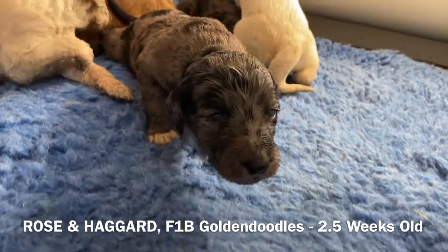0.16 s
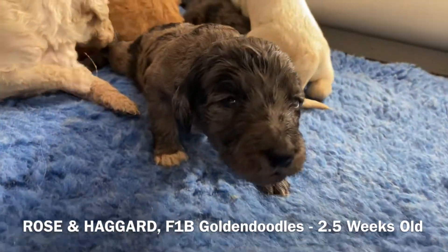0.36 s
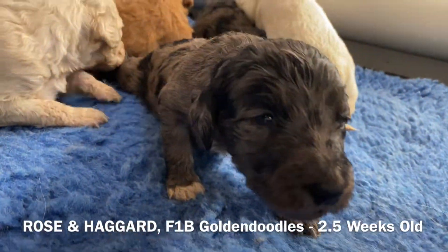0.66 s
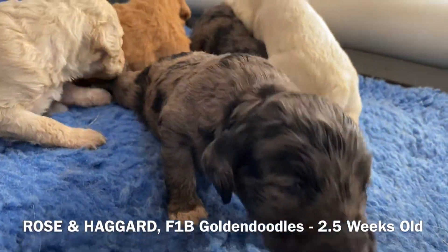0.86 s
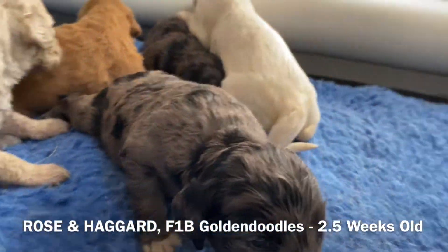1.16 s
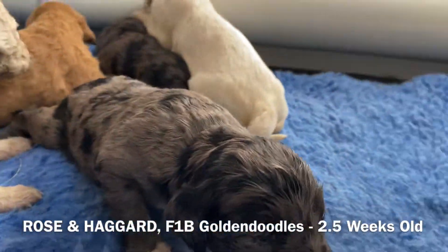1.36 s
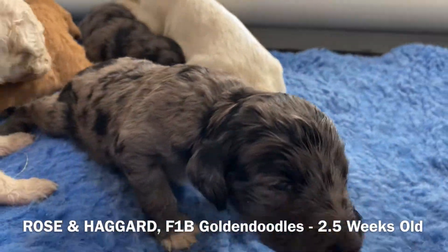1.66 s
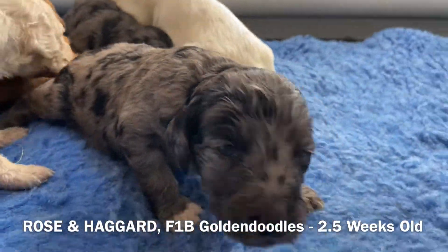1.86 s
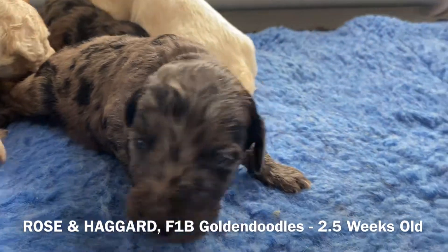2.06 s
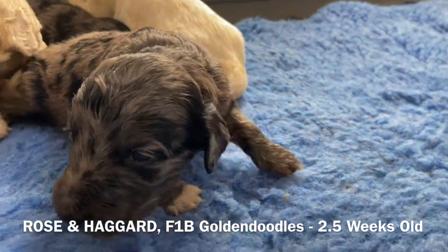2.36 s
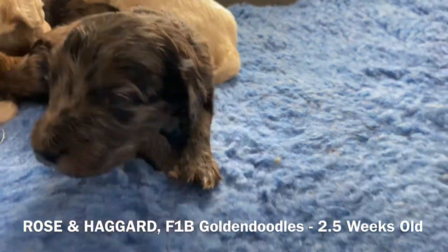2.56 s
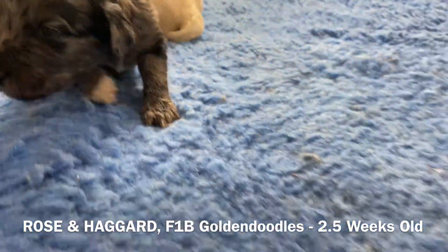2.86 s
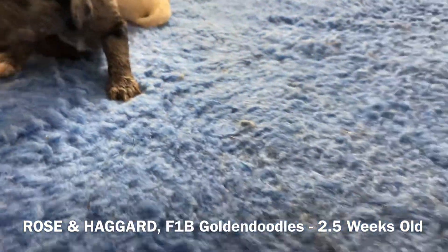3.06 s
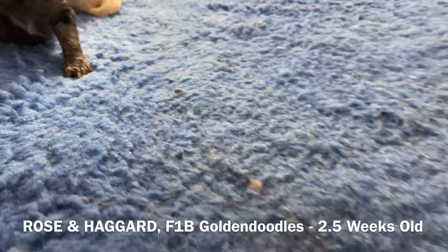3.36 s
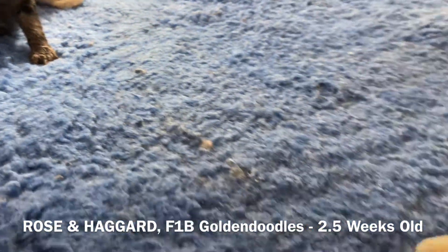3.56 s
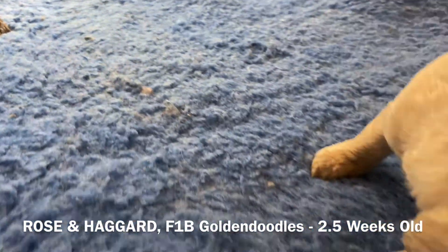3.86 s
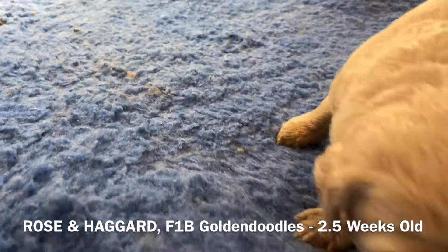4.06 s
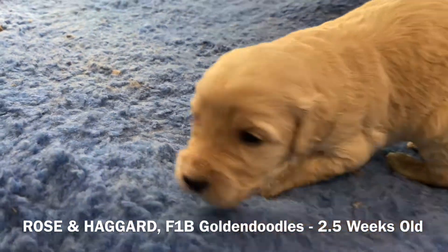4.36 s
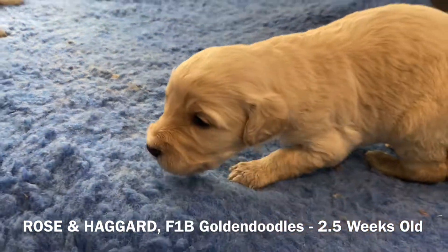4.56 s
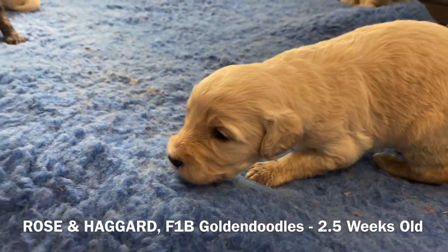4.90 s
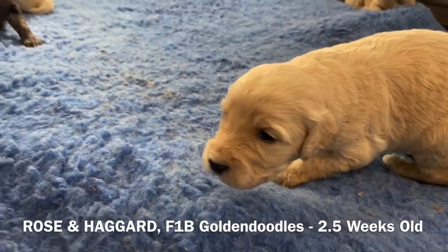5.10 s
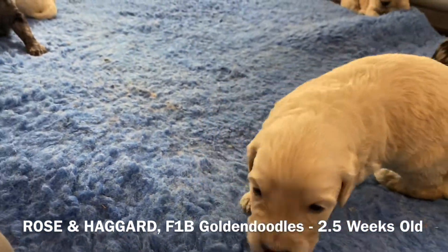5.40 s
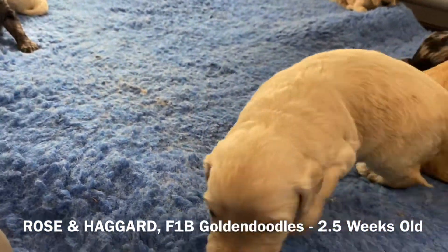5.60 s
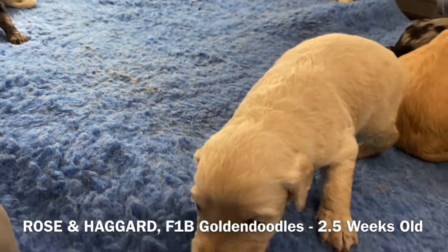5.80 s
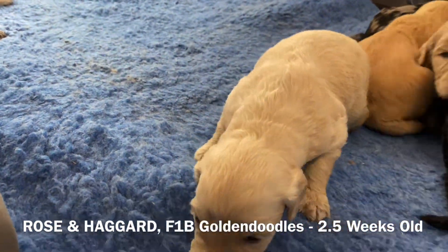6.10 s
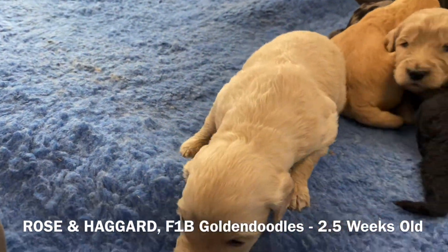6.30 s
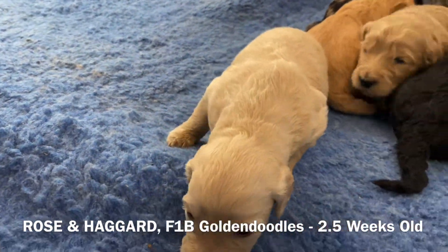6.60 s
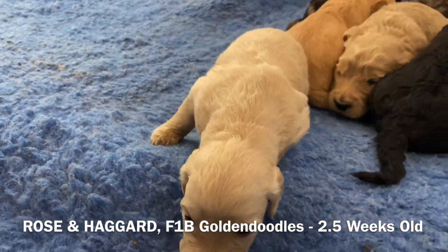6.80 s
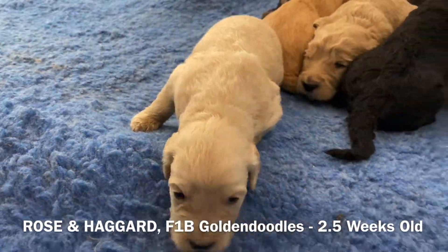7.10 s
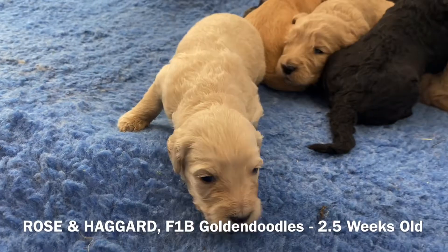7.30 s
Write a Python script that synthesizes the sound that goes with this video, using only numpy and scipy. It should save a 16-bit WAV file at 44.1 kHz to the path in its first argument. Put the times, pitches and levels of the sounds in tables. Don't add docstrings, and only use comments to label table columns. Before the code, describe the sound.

A hand-held microphone close to puppies on fleece in a lightly echoing room. Brief whimpers rise into brighter cries, with thin nose whistles, low grunts and small knocks. A sharp, deep thump interrupts, rattling briefly. After a quieter gap, a near puppy groans from a clear voice into a rasp, with a knock alongside, followed by another grunt and overlapping faint whines.

```python
import sys
import numpy as np
from scipy import signal
from scipy.fft import rfft, irfft
from scipy.io import wavfile
from scipy.ndimage import uniform_filter1d

SR = 44100
rng = np.random.default_rng(int(sys.argv[2]) if len(sys.argv) > 2 else 0)


def gain_from_db(level_db):
    decades = np.asarray(level_db, float) / 20
    return 10 ** decades


def log_audio(samples):
    frames = np.atleast_2d(samples).T
    limited = np.clip(frames, -1, 1)
    pcm = np.round(limited * 32767).astype(np.int16)
    wavfile.write(sys.argv[1], SR, pcm)


N = 328545

# (frequency [Hz], level [dB])
FLEECE = [(300, 2.5), (480, -16.5), (800, -13.5), (1500, 8.5), (2500, -5), (4500, -8), (6500, -11),
          (9000, -45.5)]


def evened(x):
    return x / np.sqrt(np.mean(x ** 2) + 1e-20)


def read(points, hz):
    f, value = np.transpose(points)
    return np.interp(np.log(hz + 1), np.log(f + 1), value)


def add(mix, s, sound):
    part = mix[round(s * SR):][:len(sound)]
    part += sound[:len(part)]


def coloured(x, points):
    hz = np.fft.rfftfreq(x.shape[-1], 1 / SR)
    return irfft(rfft(x) * gain_from_db(read(points, hz)), x.shape[-1])


def resonate(x, hz, width):
    turn = np.exp(2j * np.pi * hz * np.arange(x.shape[-1]) / SR)
    r = np.exp(-np.pi * width / SR)
    return 2 * (turn * signal.lfilter([1 - r], [1, -r], x / turn)).real


def wander(length, smooth):
    once = uniform_filter1d(rng.standard_normal(length), int(smooth))
    return evened(uniform_filter1d(once, int(smooth)))


def air(same):
    a, b = rng.standard_normal((2, N))
    return np.array([a, same * a + np.sqrt(1 - min(same, 1) ** 2) * b])


def swells(rows, rest_db):
    climb_db = -20
    t = np.arange(0, N + 64, 64)[:, None] / SR
    s, db, rise, fade = np.transpose(rows)
    before = climb_db * (s - t) / np.maximum(rise, 1e-3)
    after = -abs(fade) * (t - s)
    levels = db + np.where(t < s, before, after)
    gain = np.sqrt(gain_from_db(rest_db) ** 2 + (gain_from_db(levels) ** 2).sum(1))
    return np.interp(np.arange(N) / SR, t[:, 0], gain)


def handling():
    # (peak time [s], level [dB], rise [s], fade [dB/s])
    jolts = [(.13, -28.5, 0.2, 102), (.33, -40, 0.28, 198), (.52, -42.5, 0.35, 18.5), (.97, -33, 0.029, 56),
             (1.15, -46, 0.15, 4.5), (1.89, -25, .08, 206.5), (1.95, -36.5, 0.042, 20),
             (2.27, -32.5, 0.16, 95), (2.43, -39.5, 0.092, 145), (2.53, -38.5, .1, 151),
             (2.7, -52.5, 0.43, 13), (3.44, -46, 0.24, 392), (3.65, -34, 0.1, 192),
             (3.73, -32.5, 0.053, 109.5), (3.86, -37, 0.019, 42), (3.98, -21.5, 0.22, 91),
             (4.1, -43, 0.32, 359), (4.32, -39.5, 0.21, 54), (4.52, -37, 0.14, 37), (5.37, -50.5, .8, 23),
             (6.1, -44, 0.84, 286), (6.68, -48, 0.051, 181), (7.03, -39, 0.73, 164), (7.41, -44, 0.2, 306)]
    # (frequency [Hz], width [Hz], level [dB])
    body_modes = [(43.7, 33, -18), (56, 28, 5.5), (77.8, 22.4, 0.5), (104.2, 19, -16)]
    shake = air(.97)
    modes = 0
    for hz, width, db in body_modes:
        ringing = resonate(resonate(shake, hz, width), hz, 0.59 * width)
        modes = modes + gain_from_db(db) / np.sqrt(width) * ringing
    return evened(modes) * gain_from_db(-2.5) * swells(jolts, rest_db=-51.5)


def room_floor():
    # (frequency [Hz], level [dB])
    hum = [(100, -2.5), (165, -1.5), (200, -9), (350, -18.5), (500, -38), (700, -12.5), (900, -9),
           (1200, -21), (1600, -24), (2200, -31.5), (3200, -50), (6000, -40.5), (10000, -59.5),
           (14000, -85)]
    return gain_from_db(-52.5 + 2.5 * wander(N, 3000)) * evened(coloured(air(0.91), hum))


def rustle():
    # (peak time [s], level [dB], rise [s], fade [dB/s], airy top above it [dB])
    rubs = [(0, -61.5, .01, 61, 5.5), (.62, -70, 0.086, 86, 13.5), (.79, -75, .03, 60, -5),
            (.97, -70.5, 0.11, 99, -10), (1.196, -58.5, 0.066, 133, 16.5), (1.6, -70, 0.054, 90, 3),
            (2.18, -57, 0.087, 52, 2), (2.311, -51.5, 0.033, 143.5, 3), (2.45, -69.5, 0.14, 68.5, 12.5),
            (2.8, -60.5, 0.23, 44.5, -2), (3.09, -54.5, 0.11, 58.5, 5), (3.24, -56.5, 0.35, 53, -3.5),
            (3.6, -65, 0.19, 20.5, 3), (3.69, -55.5, 0.016, 66, -1), (3.856, -34, 0.018, 497, -17.5),
            (3.881, -44.5, 0.018, 100, -3), (4.19, -62.5, 0.1, 74.5, 9), (4.47, -53.5, 0.026, 78, -5),
            (5.214, -66, 0.015, 44, 27.5), (5.277, -51.5, 0.032, 58.5, 20.5), (5.38, -67, 0.068, 123, 22),
            (5.56, -59, 0.11, 31, 13), (5.73, -66.5, .15, 200, 19), (5.87, -67, .08, 53, -7),
            (6.06, -67.5, 0.11, 40, 10), (6.36, -66.5, 0.15, 50, 5), (6.64, -68, 0.037, 20, 5),
            (7.04, -69.5, 0.12, 34, 12), (7.3, -71, 0.2, 25, 17), (7.45, -55, 0.053, 50, -10)]
    # (frequency [Hz], level [dB])
    airy_colour = [(5000, -8), (7500, -3.5), (10000, -2.5), (12200, -9.5), (13200, -10.5), (15300, -13),
                   (15900, -67)]
    rest_db = -80.5
    moves, top_db = np.array(rubs)[:, :4], np.array(rubs)[:, 4:]
    airy_moves = moves + top_db * [0, 1, 0, 0]
    body = evened(coloured(air(0.54), FLEECE)) * gain_from_db(6.5) * swells(moves, rest_db)
    top = evened(coloured(air(0.96), airy_colour)) * gain_from_db(-17.0) * swells(airy_moves, rest_db + 9.5)
    return (body + top) * gain_from_db(1.34 * wander(N, 170))


def shuffle():
    # (peak time [s], level [dB], rise [s], fade [dB/s])
    shifts = [
        (0, -49.5, .01, 90),
        (2.14, -45, 0.29, 54),
        (3.7, -54.5, 3.2, 15),
        (5.28, -48, 0.2, 29),
        (5.7, -46, 0.18, 48),
    ]
    colour = [(120, -22.5), (200, 5), (330, -1.5), (520, -37.5), (1500, -33.5), (2500, -59.5)]  # (Hz, dB)
    dull = evened(coloured(air(0.91), colour))
    return dull * swells(shifts, rest_db=-66.5) * gain_from_db(5.1 * wander(N, 1100))


def whimpers(calls, bright_db, start_db, top_db):
    # (harmonic frequency [Hz], level [dB])
    shut_mouth = [(300, 18), (680, 6.5), (800, 8), (950, 8), (1400, 4.5), (1700, -5), (2100, -14.5),
                  (3000, -64), (12000, -76.5)]
    # (harmonic frequency [Hz], level [dB])
    open_mouth = [(3900, -16), (4400, 13), (4800, 17.5), (5700, 8), (6400, 6.5), (8500, -0.5), (11000, -11),
                  (13000, -59)]
    climb_share = .6
    out, k = np.zeros(N), np.arange(1, 12)[:, None]
    for s, length, first_hz, top_hz, db in calls:
        u = np.linspace(0, 1, round(length * SR))
        climb = np.sin(np.pi / 2 * np.minimum(u / climb_share, 1)) ** 1.4
        sag = 0.408 * np.maximum(u - climb_share, 0)
        hz = first_hz + (top_hz - first_hz) * (climb - sag)
        hz = hz * (1 + .016 * wander(len(u), 140))
        overtone_db = (start_db + (top_db - start_db) * climb) * (k > 1)
        heights = gain_from_db(read(shut_mouth, k * hz) + overtone_db)
        heights = heights + climb * gain_from_db(bright_db + read(open_mouth, k * hz))
        voice = (heights * np.cos(2 * np.pi * k * np.cumsum(hz) / SR)).sum(0)
        throb = gain_from_db(3.5 * wander(len(u), 300)) * (1 + .15 * wander(len(u), 70))
        swell = np.sin(np.pi * u ** 0.59) ** 1.28
        add(out, s, gain_from_db(db) * throb * voice * swell)
    return out


def whines():
    # (start [s], length [s], first pitch [Hz], top
    # pitch [Hz], level [dB])
    calls = [(0, 0.033, 920, 720, -56), (0.02, 0.11, 1105, 991, -65.5), (.135, 0.055, 794, 787, -57),
             (.543, 0.035, 710, 780, -53.5), (.775, 0.05, 843, 995, -63), (3.535, 0.096, 694, 617.4, -51),
             (4.975, 0.11, 741, 717, -60.5), (4.674, 0.048, 900, 966, -65), (5.986, 0.08, 867, 999, -58.5),
             (6.265, 0.13, 790, 1327, -52.5), (6.595, 0.084, 663, 724, -52), (6.69, 0.072, 877, 966, -53.5),
             (7.055, 0.0786, 837, 965, -54.5), (6.62, 0.11, 756, 1100, -53), (6.958, 0.15, 740, 1077, -53),
             (7.271, 0.11, 674, 681, -65), (7.326, 0.15, 820, 1037, -63.5), (7.405, 0.17, 678, 677, -57.5)]
    return whimpers(calls, bright_db=-37.5, start_db=-0.82, top_db=-9)


def fingers():
    # (time [s], peak level [dB])
    ticks = [(.096, -37), (.983, -38), (1.067, -35), (1.118, -35), (1.194, -38), (1.783, -39), (2.223, -32),
             (4.16, -38), (4.188, -38), (4.488, -35), (4.537, -35), (4.574, -37)]
    out, u = np.zeros(N), np.arange(220) / 220
    for s, db in ticks:
        add(out, s, gain_from_db(db + 1.5) * np.sin(2 * np.pi * 2.4 * u) * np.exp(-5 * u))
    rub = evened(resonate(rng.standard_normal(N), 450, 350))
    out += gain_from_db(-69.5 + 5.5 * wander(N, 400)) * rub
    return out * np.array([[1], [-1]])


def coos():
    # (start [s], length [s], first pitch [Hz], top pitch [Hz], level [dB])
    calls = [
        (.112, 0.1, 441, 373, -54.5),
        (.545, 0.16, 347.6, 568, -52),
        (.63, 0.047, 495, 593, -49.5),
        (1.72, 0.16, 304, 296.5, -66.5),
        (7.3, 0.045, 330, 335, -71),
    ]
    return whimpers(calls, bright_db=-60, start_db=2, top_db=-14)


def nasals():
    # (start [s], length [s], first pitch [Hz], top pitch [Hz], level [dB])
    calls = [
        (0.196, 0.1, 634, 878, -50.5),
        (.805, 0.13, 621, 869, -53.5),
    ]
    return whimpers(calls, bright_db=-37.5, start_db=4.7, top_db=-9.5)


def knocks():
    # (time [s], level [dB], centre frequency [Hz], width [Hz])
    hits = [(0.553, -56, 1820, 506), (0.589, -49.5, 1750, 600), (.62, -63, 1700, 604),
            (3.684, -51.5, 1800, 2000), (5.466, -70, 3600, 1480), (5.589, -36, 900, 680),
            (6.939, -69, 2800, 1500), (7.216, -56.5, 1500, 1210), (2.17, -70, 2060, 2520),
            (2.296, -39.5, 2210, 1960), (3.608, -46, 890, 1500), (4.19, -55, 1520, 2000),
            (4.454, -49.5, 3200, 2950), (6.62, -54, 2110, 850), (7.405, -52.5, 1830, 2350)]
    out, t = np.zeros(N), np.arange(900) / SR
    for s, db, hz, width in hits:
        grit = rng.standard_normal(900)
        puff = evened(resonate(resonate(grit, hz, width), hz, width))
        add(out, s, gain_from_db(db - 60 * t / 0.046) * puff)
    return out


def whistles():
    # (start [s], length [s], pitch [Hz], level [dB], favoured harmonic [number])
    tones = [
        (0.635, 0.11, 3400, -70.5, 2.32),
        (2.716, 0.057, 3778, -49, 0.88),
        (3.056, 0.11, 3550, -48, 1.3),
        (4.039, 0.074, 3410, -69, 2.26),
        (4.45, 0.034, 461.6, -42, 2.93),
        (5.895, 0.1, 3530, -74, 2.05),
        (6.45, 0.041, 2870, -67.5, .99),
        (6.475, 0.2, 3490, -77, 2.85),
        (6.697, 0.057, 3664, -64.5, 1.26),
    ]
    loss_db = -11.5
    out, k = np.zeros(N), np.arange(1, 4)[:, None]
    for s, length, hz, db, favoured in tones:
        count = round(length * SR)
        onset_dip = .03 * np.exp(-np.arange(count) / 500)
        turns = np.cumsum(hz * (1 + .012 * wander(count, 250) - onset_dip)) / SR
        heights = gain_from_db(db + loss_db * abs(k - favoured))
        tone = (heights * np.cos(2 * np.pi * k * turns)).sum(0)
        add(out, s, tone * np.hanning(count) ** .5)
    return out


def cries():
    # (start [s], length [s], first pitch [Hz], top pitch [Hz], level [dB])
    calls = [
        (1.172, 0.21, 656.5, 989, -52),
        (1.553, 0.1, 681, 957, -49),
        (1.925, 0.17, 719.6, 999, -49.5),
        (2.16, 0.049, 960, 1057, -60.5),
        (2.309, 0.12, 863, 956, -45),
        (2.646, 0.17, 643.4, 956, -50.5),
    ]
    return whimpers(calls, bright_db=-25.5, start_db=-2.5, top_db=0.83)


def throat(rows, roughness):
    # (frequency [Hz], level [dB])
    chest_colour = [(150, -8), (220, 1), (340, -1), (430, -5), (500, -2), (620, -3), (760, 1), (880, -1),
                    (1050, -17), (1300, -38), (4000, -70)]
    # (frequency [Hz], level [dB])
    mouth_colour = [(650, -30), (860, -4), (1050, -26), (1250, -40), (1550, -16), (2500, -24), (3200, -44),
                    (6000, -60)]
    s, pitch_hz, effort_db, mouth_db = np.transpose(rows)
    t = np.arange(s[0], s[-1], 1 / SR)
    rough = np.interp(t, *np.transpose(roughness))
    unsteady = .013 * wander(len(t), 600) + .14 * rough * wander(len(t), 130)
    turns = np.cumsum(np.interp(t, s, pitch_hz) * (1 + unsteady)) / SR
    folds = sum(np.cos(2 * np.pi * k * turns + 1.3 * k ** 2) for k in range(1, 12))
    every_other = 1.1 * rough * np.cos(np.pi * turns)
    folds = folds * (1 + every_other + .6 * rough * wander(len(t), 130))
    puffs = (0.24 + np.exp(-(turns % 1) / 0.2)) * rng.standard_normal(len(t))
    drive = (1 - rough) * evened(folds) + 1.9 * rough * evened(puffs)
    low, high = coloured(drive, chest_colour), coloured(drive, mouth_colour)
    voice = low + gain_from_db(np.interp(t, s, mouth_db)) * high
    voice = voice / np.sqrt(uniform_filter1d(low ** 2, 1500) + 1e-6)
    lumps_db = 3.5 * rough * wander(len(t), 740)
    effort = gain_from_db(np.interp(t, s, effort_db) + 1.0 + lumps_db)
    return s[0], effort * voice * signal.windows.tukey(len(t), 900 / len(t))


def grunts():
    # (start [s], length [s], first pitch [Hz], last pitch [Hz], effort [dB])
    calls = [
        (1.968, 0.24, 264, 252.9, -40),
        (2.717, 0.11, 216.8, 218, -43),
        (3.104, 0.062, 256.4, 243, -44),
        (3.602, 0.18, 223.4, 191.2, -44),
        (5.09, 0.18, 202.7, 188.7, -52.5),
        (5.749, .2, 278, 242, -42.5),
        (7.064, .1, 199, 192.6, -56.5),
    ]
    clean_hz, rasp_hz = 300, 180
    out = np.zeros(N)
    u = np.array([0, 0.39, 0.61, 1])
    effort_steps = np.array([-2.5, 0, -2.5, -4.5])
    for start, length, first_hz, last_hz, db in calls:
        s = start + length * u
        hz = first_hz + (last_hz - first_hz) * u
        rows = np.transpose([s, hz, db + effort_steps, -23 + 0 * u])
        rough = np.clip((clean_hz - hz) / (clean_hz - rasp_hz), .2, 1)
        add(out, *throat(rows, np.transpose([s, rough])))
    return out


def mews():
    # (start [s], length [s], first pitch [Hz], top pitch [Hz], level [dB])
    calls = [
        (2.985, .2, 639, 964.4, -48.5),
        (3.337, 0.1, 668, 936.6, -47),
    ]
    return whimpers(calls, bright_db=-31.5, start_db=1.5, top_db=1.5)


def slides():
    # (start [s], length [s], first pitch [Hz], last pitch [Hz], level [dB])
    tones = [
        (3.04, .09, 3286, 3430, -59),
        (4.96, 0.055, 2730, 2660, -79),
        (5.142, 0.03, 3100, 3000, -77),
        (6.324, 0.035, 1310, 1290, -64),
        (6.33, .11, 3805, 4060, -69),
        (6.844, 0.051, 3450, 3160, -72),
        (7.161, 0.064, 3800, 4040, -72.5),
        (7.338, 0.086, 3480, 3500, -72),
    ]
    out = np.zeros(N)
    for s, length, first_hz, last_hz, db in tones:
        count = round(length * SR)
        hz = np.linspace(first_hz, last_hz, count) * (1 + .01 * wander(count, 200))
        tone = np.cos(2 * np.pi * np.cumsum(hz) / SR)
        add(out, s, gain_from_db(db) * tone * np.hanning(count) ** .5)
    return out


def bump():
    # (frequency [Hz], level [dB], time to fall 60 dB [s], delay [s])
    modes = [
        (108, -9, .13, .0165),
        (58, -16.5, .8, .0275),
        (150, -27, .3, .04),
        (210, -28, .3, .02),
        (620, -18, .08, .0045),
        (840, -20, .1, .003),
        (1110, -19, .08, .002),
    ]
    # (frequency [Hz], level [dB])
    rattle_colour = [(120, 5), (200, 6), (400, -2.5), (600, -15), (900, 5.5), (1300, -9.5), (2000, -51.5)]
    crack_colour = [(3000, -12.5), (6500, 4.5), (9000, -2.0), (11000, -10.5), (14500, 3), (17000, -17.5)]
    bump_s = 3.842
    out, t = np.zeros(N), np.arange(SR // 2) / SR
    grit = rng.standard_normal((3, len(t)))
    crack = evened(coloured(grit[0], crack_colour))
    clatter = evened(coloured(grit[1], FLEECE))
    rattle = evened(coloured(grit[2], rattle_colour)) * np.minimum(t / 0.004, 1)
    add(out, bump_s, gain_from_db(-20.5 - 60 * t / 0.03) * crack)
    add(out, bump_s + .002, gain_from_db(-26 - 60 * t / .1) * clatter)
    add(out, bump_s + .012, gain_from_db(-21.0 - 60 * t / 0.46) * rattle)
    for hz, db, t60, delay in modes:
        ring = np.sin(2 * np.pi * hz * t) * np.minimum(t * hz * 4, 1)
        add(out, bump_s + delay, gain_from_db(db - 60 * t / t60) * ring)
    return out


def groan():
    # (time [s], pitch [Hz], effort [dB], mouth opening [dB])
    course = [
        (5.207, 413.7, -32.5, -2.5),
        (5.296, 441.7, -32.5, 0.5),
        (5.336, 331.2, -25, -8),
        (5.395, 288.6, -27.5, -22),
        (5.425, 245.4, -29.5, -37),
        (5.49, 232.3, -30, -12),
        (5.555, 254.2, -27, -11.5),
        (5.66, 213.4, -30.5, -26.5),
        (5.79, 189, -40, -25),
    ]
    # (time [s], roughness [0-1])
    roughness = [
        (5.2, .12),
        (5.4, .15),
        (5.43, .5),
        (5.58, .55),
        (5.62, .65),
        (5.8, .7),
    ]
    out = np.zeros(N)
    add(out, *throat(course, roughness))
    return out


def room(x):
    # (frequency [Hz], time to fall 60 dB [s])
    decay = [(200, 0.38), (660, 0.52), (1740, 0.57), (4600, 0.44), (8000, 0.39), (12000, 0.28)]
    taps = np.zeros((2, SR))
    at = np.arange(300, SR - 20, 20) + rng.integers(0, 20, (2, (SR - 301) // 20))
    np.put_along_axis(taps, at, rng.choice([-1., 1.], at.shape), 1)
    taps[1] = 0.97 * taps[0] + 0.68 * taps[1]
    hz, t, z = signal.stft(taps, SR, nperseg=256)
    fading = z * gain_from_db(-60 * t / read(decay, hz)[:, None])
    tail = signal.istft(fading, SR, nperseg=256)[1]
    return signal.fftconvolve(x[None], tail / np.linalg.norm(tail[0]), axes=1)[:, :N]


def scene():
    near = coos() + grunts() + groan()
    far = whines() + nasals() + knocks() + whistles() + cries() + mews() + slides()
    hit = bump()
    thin_hit = signal.lfilter([1, -.93], 1, hit)
    wet = room(gain_from_db(4.0) * far + gain_from_db(-13.5) * near + gain_from_db(-3.0) * thin_hit)
    direct = far * gain_from_db(np.array([[4.5], [1.5]])) + near * gain_from_db(np.array([[1.5], [-1.5]])) + hit
    return direct + wet + rustle() + shuffle() + handling() + room_floor()


def roll_off(x):
    return signal.sosfilt(signal.butter(12, 15800, fs=SR, output="sos"), x)


def record(dry):
    # (frequency [Hz], phase [radians])
    phase_turn = [(30, .9), (65, .7), (120, .05), (440, .8), (600, -2.2), (970, -2.5), (1380, -3.5),
                  (5000, -6.1), (6890, -3.4), (9730, -.3), (12500, 2.1), (13400, 3.1), (14400, 3.6),
                  (15700, 6.1)]
    # (frequency [Hz], level [dB])
    lean = [(60, .4), (200, .6), (380, 5), (700, 1), (1290, .5), (2380, 2), (4400, -1), (8120, 0)]
    hz = np.fft.rfftfreq(N, 1 / SR)
    half = np.array([[.5], [-.5]])
    hollow_db = -2.5 * np.exp(-((hz - 1175) / 70) ** 2)
    turned = rfft(dry) * np.exp(1j * half * read(phase_turn, hz))
    ports = turned * gain_from_db(half * read(lean, hz) + hollow_db)
    return roll_off(irfft(ports, N) + fingers())


dry = scene()
out = record(dry)
log_audio(out)
```